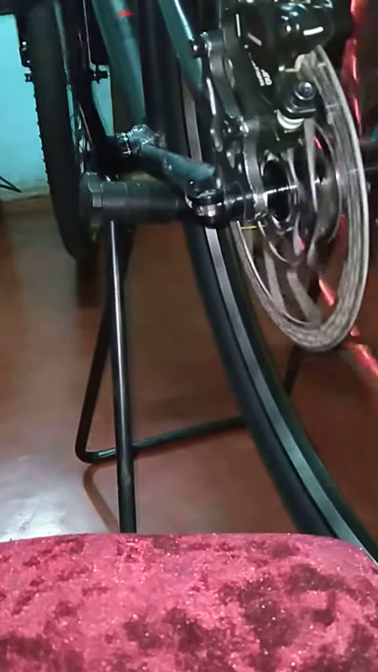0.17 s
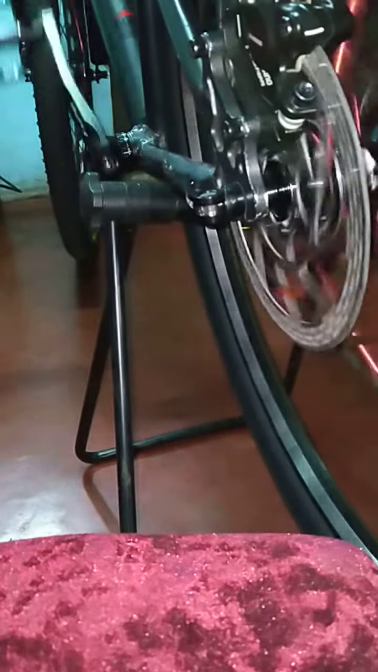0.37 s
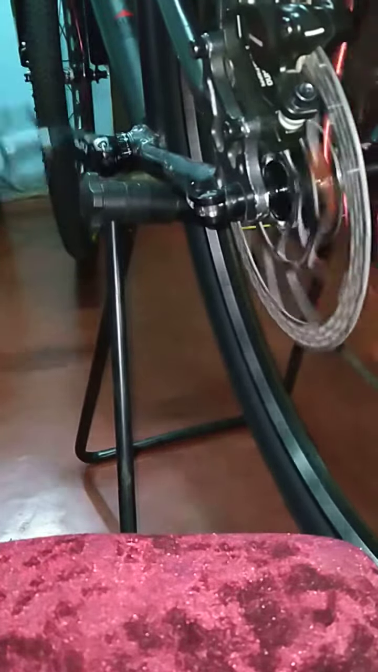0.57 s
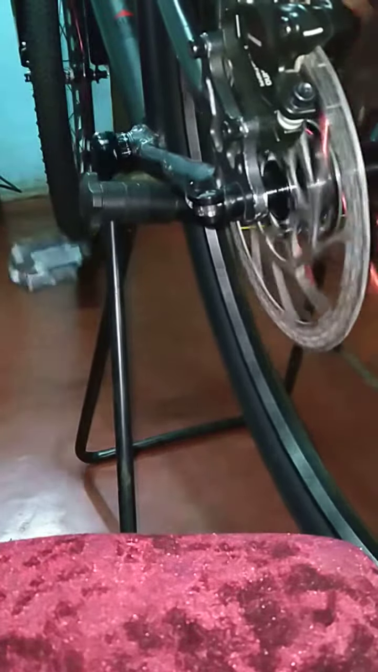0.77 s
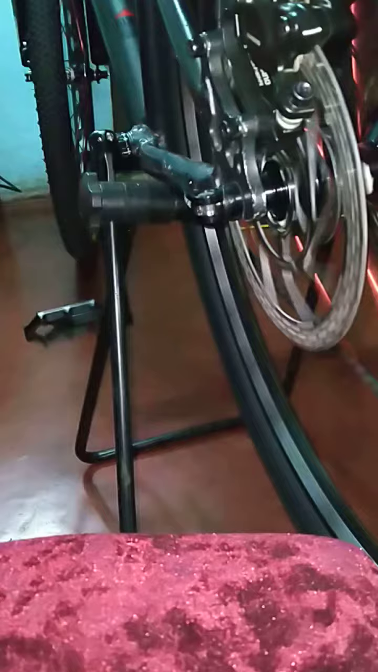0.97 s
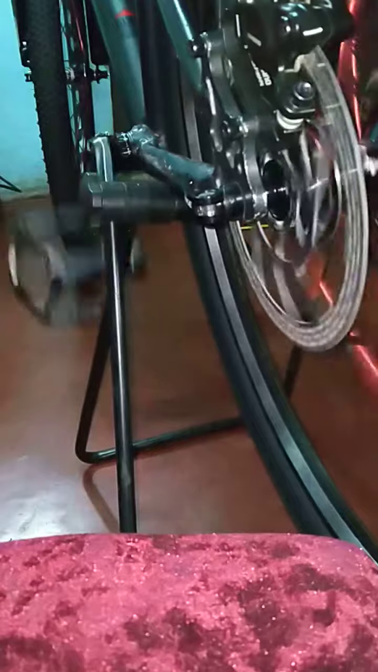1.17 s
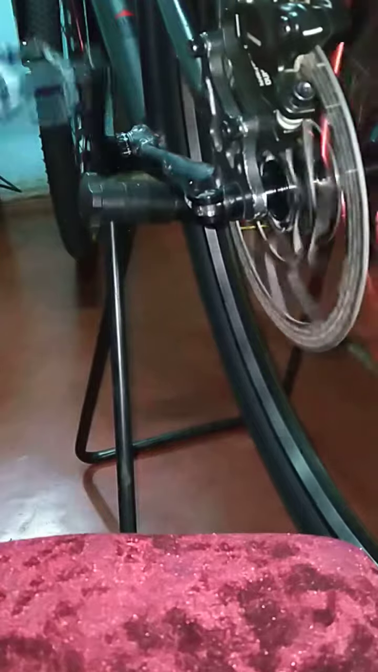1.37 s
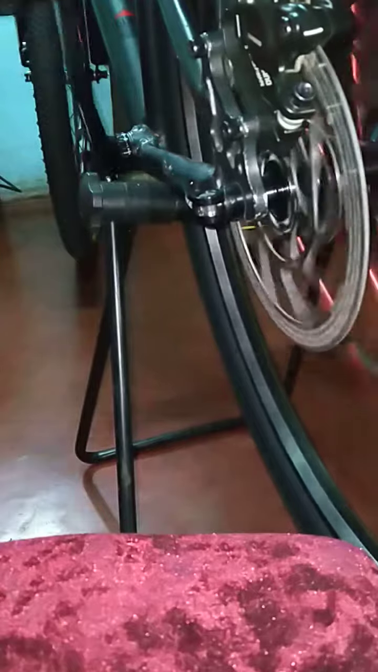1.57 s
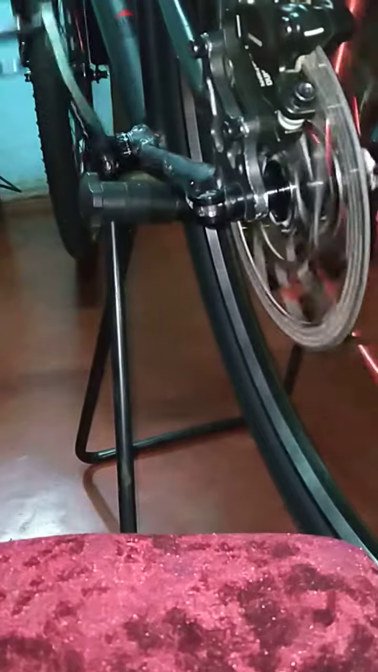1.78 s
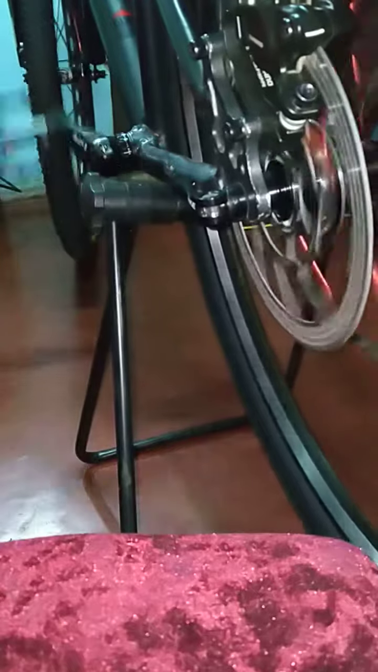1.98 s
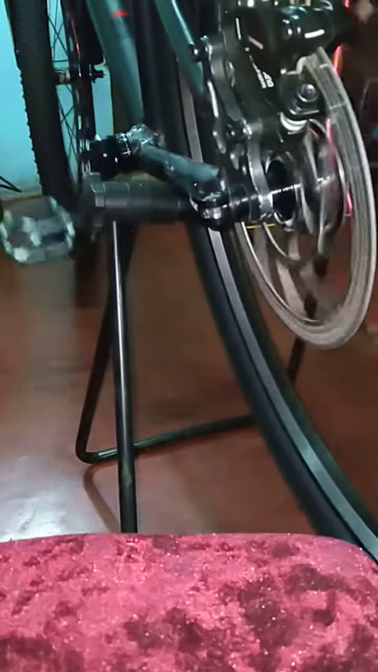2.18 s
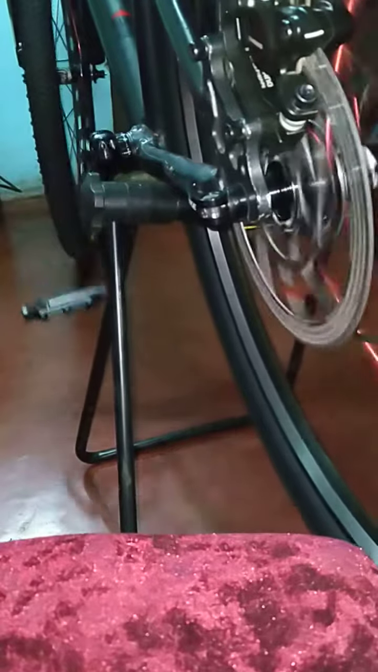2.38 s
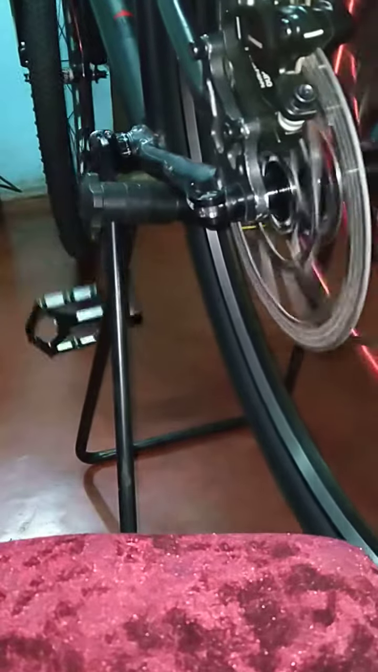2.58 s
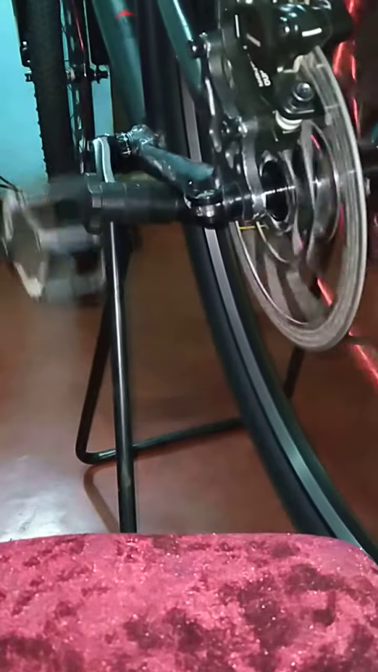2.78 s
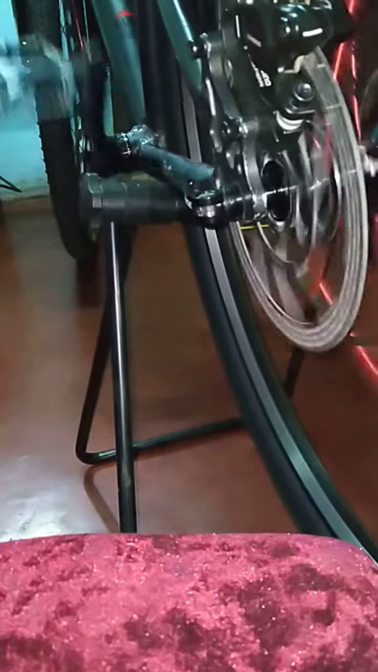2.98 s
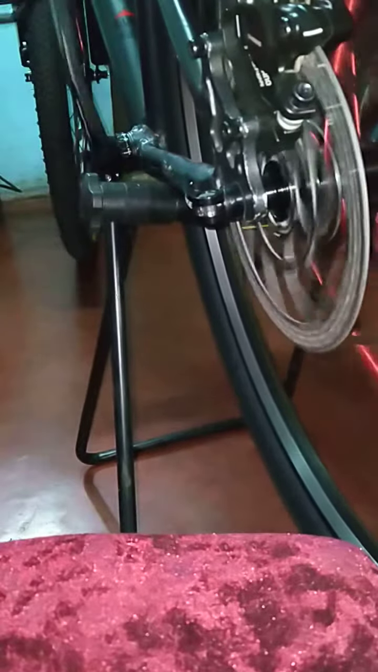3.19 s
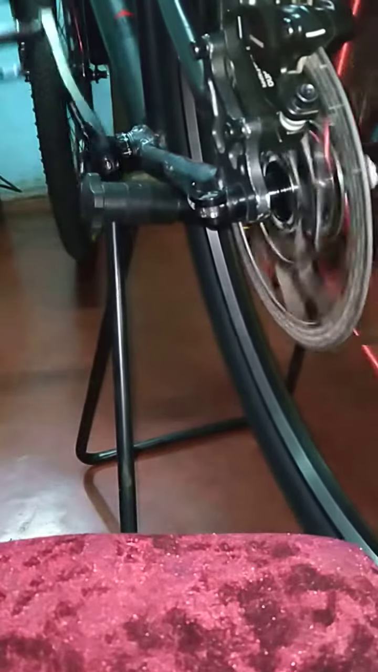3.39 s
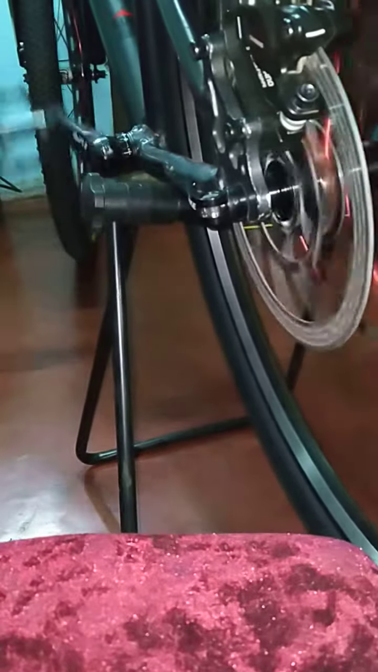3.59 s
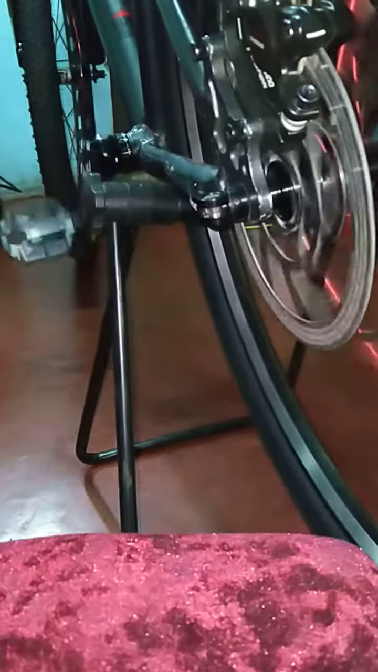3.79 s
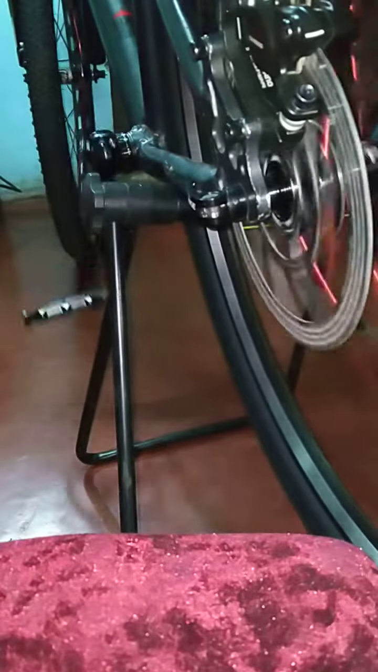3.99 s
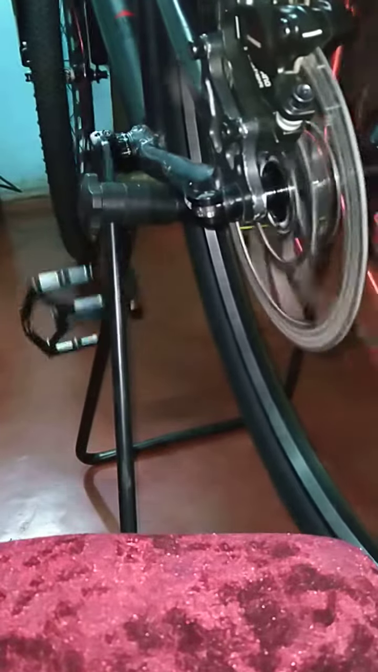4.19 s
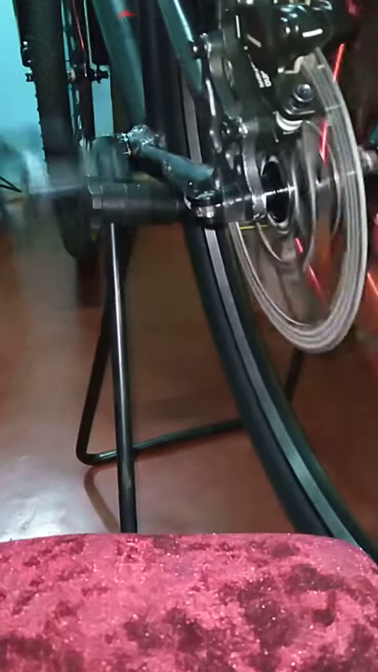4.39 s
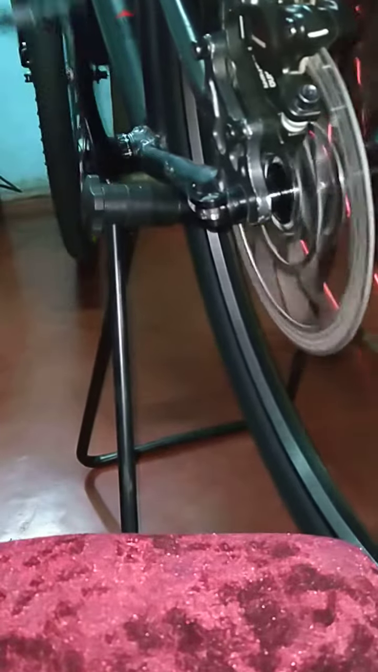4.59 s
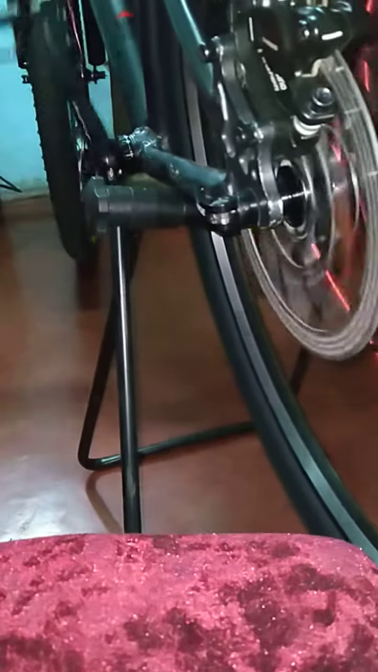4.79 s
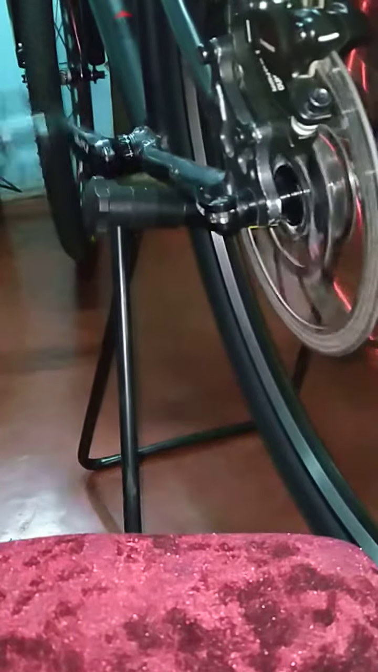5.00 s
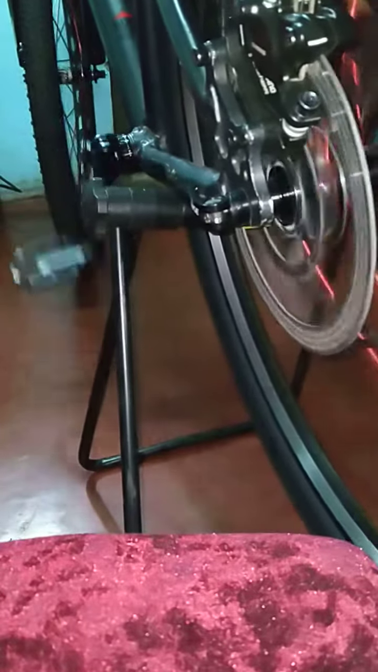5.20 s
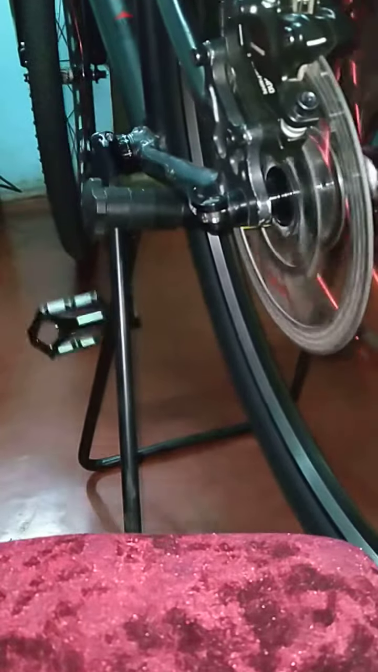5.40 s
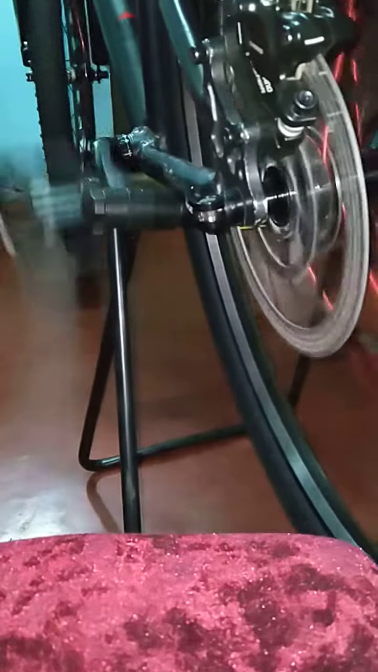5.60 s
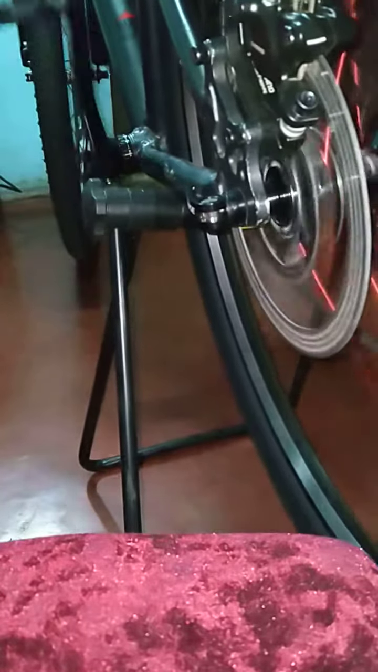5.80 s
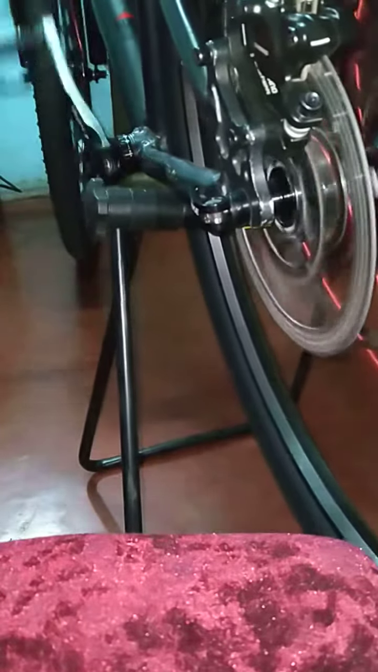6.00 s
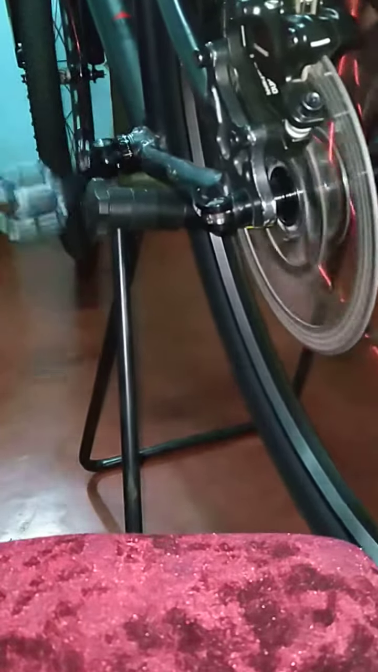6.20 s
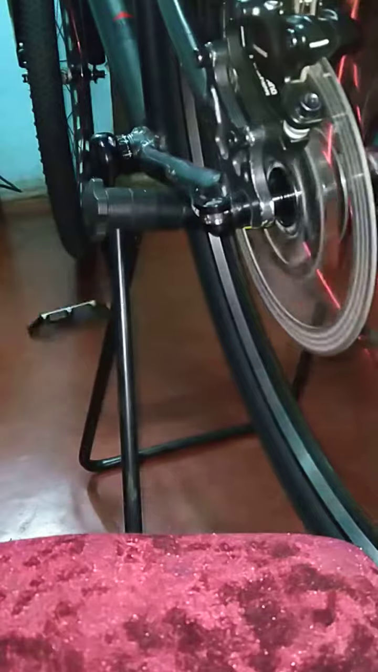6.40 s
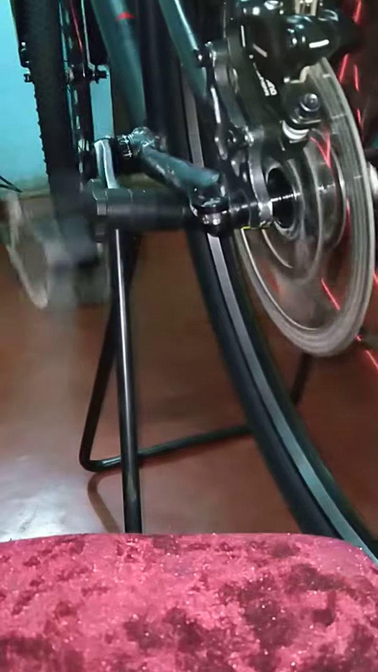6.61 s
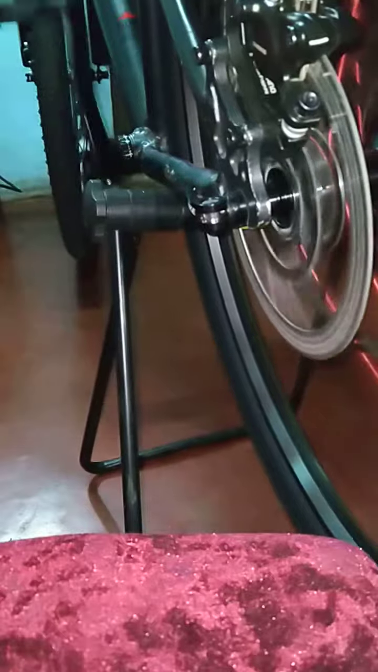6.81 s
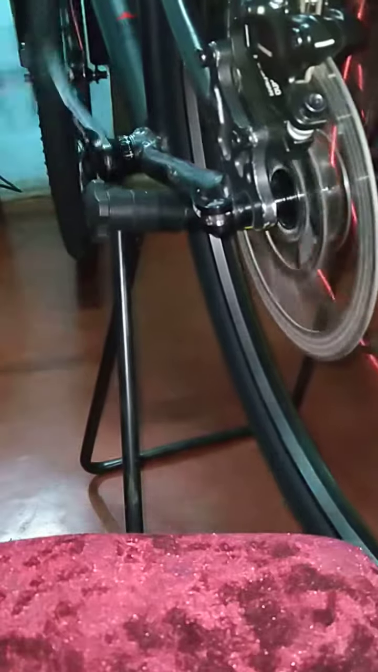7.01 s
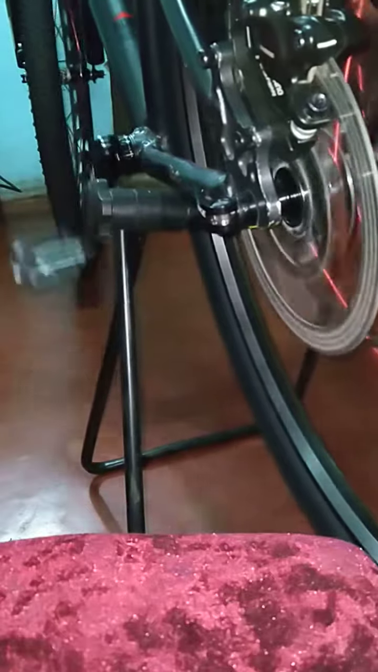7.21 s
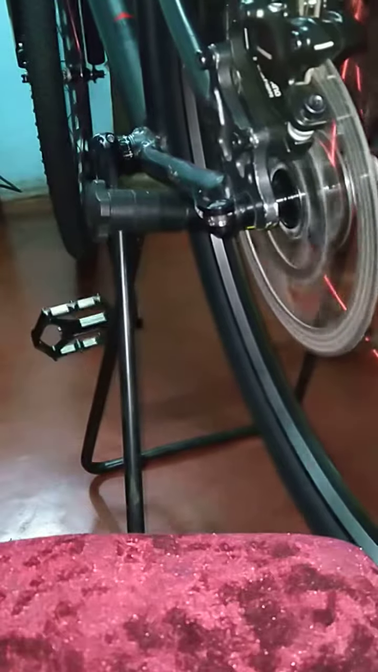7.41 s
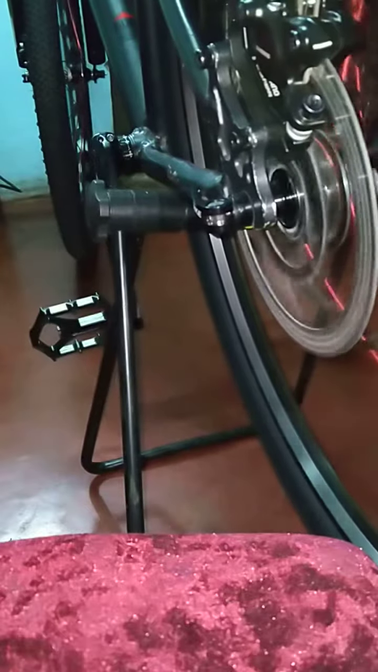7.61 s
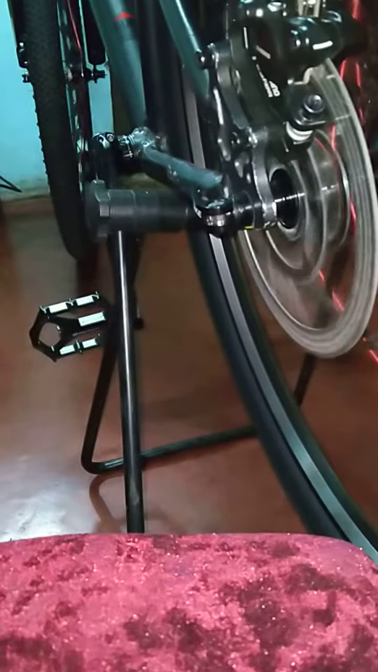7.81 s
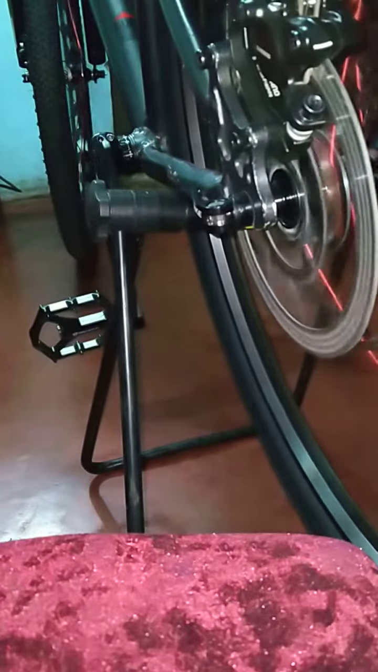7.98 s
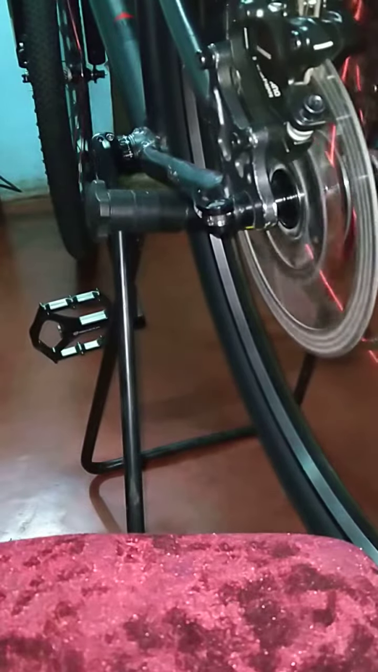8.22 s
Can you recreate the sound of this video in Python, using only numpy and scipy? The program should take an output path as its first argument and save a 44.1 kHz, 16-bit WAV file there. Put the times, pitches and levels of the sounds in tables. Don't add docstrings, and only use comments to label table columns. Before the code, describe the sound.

A bicycle on a stand is cranked by hand, heard close on a phone microphone in a small hard-floored room. From 0 seconds, crisp chain ticks run at about fifty per second, slightly uneven, over low wheel and stand rumble, bearing whirr and faint hiss. Between about 0.7 and 3.3 seconds gear shifting makes irregular metallic clanks and short rattles, strongest near 0.95, 1.1, 1.8, 2.9 and 3.2, with duller frame knocks between them. The ticking slows slightly around 2.2 and again at 3.3 to 3.6, then steadily accelerates, with only occasional small knocks. From 5 to 7.4 the chain whirrs faster and louder, nearly ninety ticks per second, with a firmer knock at 6.4. At 7.4 the crank stops: a loud sharp snap, then freehub clicks quickly gather into a bright, loud, ringing ratchet buzz, about two hundred teeth per second, sustained until the cut at about 8.25.

```python
import sys
import numpy as np
from scipy import signal
from scipy.fft import rfft, irfft
from scipy.io import wavfile

SR = 44100
rng = np.random.default_rng(int(sys.argv[2]) if len(sys.argv) > 2 else 0)


def wav_record(signal):
    frames = np.transpose(np.atleast_2d(signal))
    bounded = np.clip(frames, -1, 1)
    quanta = np.round(bounded * 32767).astype(np.int16)
    wavfile.write(sys.argv[1], SR, quanta)


def voltage_ratio(decibels):
    exponent = np.asarray(decibels, float) / 20
    return 10 ** exponent


N = 363825
CRANK_STOP_S = 7.405


def links(level_db=-5.5, tail_t60=0.052):
    # (frequency [Hz], density [dB per Hz])
    tick_colour = [(710, -29), (1200, -6.5), (1980, -8.5), (2890, -6), (5020, -20), (7410, 3),
                   (11400, -26.5), (14800, 10), (16000, -2)]
    band_levels = (-3, 0, 6, -1.5)
    band_edges = ((800, 4300), (4300, 9000), (9000, 12500), (12500, 19000))
    tail_db, colour_spread_db = -11, 1.8
    s, db = link_times()
    colours = rng.standard_normal((900, 4))[:len(s)]
    noise = coloured(rng.standard_normal(N), tick_colour)
    out = 0
    for colour, band_db, edges in zip(colours.T, band_levels, band_edges):
        strikes = np.zeros(N)
        strikes[(s * SR).astype(int)] = voltage_ratio(db + level_db + band_db + colour_spread_db * colour)
        envelope = snap(strikes) + voltage_ratio(tail_db) * dying(strikes, tail_t60)
        out = out + envelope * band(noise, *edges)
    return out


def link_times():
    # (time [s], rate [links per s])
    chain = [(0, 54.18), (.7, 52.78), (1.3, 51.52), (1.9, 53.33), (2.2, 43.55), (2.87, 44.74),
             (2.97, 53.95), (3.2, 57.39), (3.3, 44.32), (3.6, 43.41), (4, 49.8), (4.5, 55.7), (5, 58.71),
             (5.4, 66.65), (5.8, 67.85), (6.4, 74.68), (7, 83.73), (7.42, 88.96)]
    # (time [s], peak level [dB])
    catch = [
        (7.413, -16.5),
    ]
    # (time [s], peak level [dB])
    stiff = [(0.0433, -59), (0.0794, -44), (0.1957, -51), (0.244, -44), (0.344, -45), (0.4414, -49),
             (0.711, -43), (0.819, -44), (1.5242, -32), (1.6721, -32.5), (1.8684, -31.5), (2.12, -24),
             (2.4019, -38), (2.6602, -28.5), (2.8933, -36), (3.6114, -42), (3.6274, -35), (3.872, -41),
             (4.3334, -41), (4.344, -44), (4.4693, -43), (4.6294, -43), (4.7136, -42.5), (5.111, -36.5),
             (5.241, -38), (5.6063, -41.5), (5.7855, -40), (6.815, -37), (6.8448, -42), (7.196, -34.5)]
    first_link, reseat_late = .37, .25
    link_db, inner_db, reseat_db, stiff_db = -41.5, -4.5, -7, 10
    pull_share, slack_db, spread_db = 0.83, 1.5, 2.5
    per_s = in_time(chain)[0]
    passed = np.cumsum(per_s) / SR - first_link
    count = np.arange(int(passed[int(CRANK_STOP_S * SR)]))
    chance = rng.standard_normal((600, 3))[:len(count)]
    s = np.interp(count + .04 * chance[:, 0], passed, np.arange(N) / SR)
    at = (s * SR).astype(int)
    outer = count % 2 == 0
    db = (pulled((link_db, pull_share, 0)) + slack_db * drift(6.5))[at]
    db = db + inner_db * ~outer + spread_db * chance[:, 1]
    again_s = s + reseat_late / per_s[at]
    again_db = db + reseat_db + spread_db * chance[:, 2]
    again = np.transpose([again_s, again_db])[outer]
    return np.vstack([catch, np.add(stiff, [0, stiff_db]), np.transpose([s, db]), again]).T


def clanks(rise_s=0.0022, hold_t60=0.19, fall_t60=0.19, grain_db=2.5, knock_db=4.5, knock_t60=0.014, room_db=-21.5):
    # (frequency [Hz], density [dB per Hz])
    clank_colour = [(59, 0), (100, -13.5), (452, -4), (801, -13), (930, -8.5), (1760, -3.5), (2000, -5),
                    (2990, -5), (3940, -5), (4200, -5.5), (6020, -3.5), (7450, 6), (9820, -5.5), (15000, 0),
                    (16000, 13)]
    # (frequency [Hz], width [Hz], level [dB])
    sprocket_modes = [(760, 70, 0), (1050, 70, 7), (1250, 70, 6), (1700, 80, 8), (2350, 80, 8),
                      (2800, 90, 6), (3350, 90, 6), (4250, 120, 4), (5350, 150, 8)]
    # (time [s], peak
    # level [dB], ring frequency [Hz], thud level [dB], rattle length [s])
    bright_clanks = [(0.711, -49, 1780, -4, 0.01), (0.949, -26, 1780, -16, 0.055),
                     (1.122, -27.5, 2330, -14, 0.026), (1.412, -41, 790, 6, 0.049), (1.428, -30, 1090, -8, 0.017),
                     (1.449, -37.5, 2870, 9.5, 0.025), (1.489, -39, 1120, -2, 0.011),
                     (1.666, -50.5, 1830, 9, 0.04), (1.788, -24.5, 1190, -22.5, 0.036),
                     (1.868, -44, 1630, 7, 0.021), (1.942, -27, 1920, -16.5, 0.019),
                     (2.115, -29, 3200, -10.5, 0.067), (2.327, -30, 3200, -12, 0.019),
                     (2.659, -46.5, 2330, -3, 0.011), (2.912, -40.5, 1060, -2, 0.032),
                     (2.933, -24.5, 1820, -25, 0.037), (3.089, -46, 1280, -6, 0.05),
                     (3.208, -24.5, 990, -6, 0.035), (3.229, -24.5, 1710, -15, 0.021),
                     (3.253, -34.5, 1580, 8.5, 0.042), (3.625, -49, 2290, 3, 0.029),
                     (6.648, -43.5, 2570, -3, 0.063), (6.76, -48.5, 1320, 13, 0.097), (7.151, -40, 990, 8, 0.035)]
    # (time [s], peak level [dB], ring frequency [Hz], thud level [dB], jingle level [dB])
    knocks = [(0.242, -49.5, 2030, -3, -22), (0.335, -58.5, 1060, 9, -25), (0.786, -41.5, 1320, 1, -17.5),
              (0.83, -37, 1930, -0.5, -8), (1.086, -40.5, 990, 0, -12), (1.518, -40.5, 1330, 0, -16),
              (2.381, -39, 1040, 4, -24), (2.636, -28.5, 980, -7.5, -2.5), (3.314, -49.5, 980, 5, -22),
              (3.801, -41.5, 890, -1, -7), (3.87, -48.5, 2310, -7, 0), (4.017, -40, 1070, 2, -23),
              (4.293, -38.5, 3330, 0.5, -2.5), (4.884, -44, 3350, -23, -5), (5.112, -39.5, 2920, -4, -7),
              (5.24, -50, 2950, -25, -13), (5.337, -36.5, 1010, -4.5, -16), (5.53, -46, 910, 5, -13),
              (5.71, -45.5, 956, 1, 0), (5.784, -47, 1110, 8, 4), (6.42, -33, 1080, -2.5, -20.5),
              (7.193, -41.5, 2220, -18, -7), (7.333, -34.5, 1140, -14, -21), (7.528, -39.5, 990, 1, -19.5)]
    shift_jingle_db, knock_rattle_s, sprocket_db = 1.5, .022, -6
    jingle_follows, kick_follows_thud = 1.4, 0.37
    frame_hz, frame_width_hz, frame_db = 948, 10.5, -7.5

    out, kicks, t = np.zeros(N), np.zeros(N), np.arange(SR // 3) / SR
    noise = rng.standard_normal(N)
    grains_db = grain_db * rng.exponential(1, N // 32 + 1).clip(0, 3)
    rattle = coloured(noise * voltage_ratio(grains_db.repeat(32)[:N]), clank_colour)
    regions = ((100, 650), (550, 3700), (3700, 19000))
    thud, body, jingle = (rms_one(band(band(rattle, *edges), *edges)) for edges in regions)
    bright = body + 2 * jingle
    rings = np.array([voltage_ratio(g + sprocket_db) * resonate(bright, hz, width) for hz, width, g in sprocket_modes])
    strengths = voltage_ratio(4 * rng.standard_normal((80, len(rings))))
    blows = [(*row[:4], shift_jingle_db, row[4]) for row in bright_clanks]
    blows += [(*row, knock_rattle_s) for row in knocks]
    for (s, db, hz, thud_db, jingle_db, length), mix in zip(blows, strengths):
        at = slice(int(s * SR), min(N, int(s * SR) + len(t)))
        u = t[:at.stop - at.start]
        fall = voltage_ratio(-60 * u / hold_t60 - 60 * np.maximum(u - length, 0) / fall_t60)
        shape = (1 - np.exp(-u / rise_s)) * (fall + voltage_ratio(room_db - u / 0.0046))
        mix[-2:] *= min(1, voltage_ratio(jingle_db))
        middle = shape * (body[at] + mix @ rings[:, at])
        middle = middle + resonate(middle, hz, 250)
        knock = voltage_ratio(knock_db - 0.86 * jingle_db - 60 * u / knock_t60) * (1 - np.exp(-u / 0.0005))
        knock = knock * (np.sin(2 * np.pi * hz * u) + 0.27 * np.sin(2 * np.pi * 2380 * u))
        ends = voltage_ratio(thud_db + 5.0) * thud[at] + voltage_ratio(jingle_follows * jingle_db + 11) * jingle[at]
        out[at] += voltage_ratio(db - 13.0) * (knock + middle + shape * ends)
        kicks[at] += voltage_ratio(db + 2.0 + kick_follows_thud * thud_db) * shape
    stand = resonate(kicks * rng.standard_normal(N), 167.0, 18.0)
    frame = resonate(out, frame_hz, frame_width_hz)
    return out + voltage_ratio(15.0) * stand + voltage_ratio(frame_db) * frame


def freehub(level_db=1.55):
    # (time [s], rate [teeth per s], level [dB])
    freewheel = [(7.432, 40, -38), (7.46, 66, -33.5), (7.49, 126, -31), (7.538, 161, -32),
                 (7.628, 220, -33), (7.68, 227, -32.5), (7.764, 223, -32.5), (7.945, 207, -32.8),
                 (8.25, 206.5, -32.8)]
    # (lateness [share of a tooth], level [dB])
    pawls = [
        (0, 0),
        (.16, -3),
        (.36, -5),
    ]
    # (frequency [Hz], width [Hz], level [dB])
    hub_modes = [(2255, 130, -5.5), (2330, 30, -5), (2450, 30, -12), (3345, 24, -4), (1780, 54, -7),
                 (6890, 90, -4), (7480, 200, -0.5)]
    # (frequency [Hz], density [dB per Hz])
    hub_colour = [(410, -70), (700, -39), (1050, -19), (1180, -19), (1280, -14.5), (2240, -5),
                  (2590, -10.5), (3460, -10), (4050, -15.5), (5330, -14.5), (7390, -12), (10100, -22.5),
                  (12600, -23.5), (14800, -6.5), (16000, -10.5)]
    chatter_db, ring_db, sway_db = -1, 7, 1.5
    per_s, db = in_time(freewheel)
    coasting = np.arange(N) >= freewheel[0][0] * SR
    teeth = np.cumsum(per_s * coasting) / SR + .64
    t = np.arange(SR // 5) / SR
    hits, chatter = 0, 0
    for late, pawl_db in pawls:
        wander = .05 * drift(11)
        at = np.flatnonzero(np.diff(np.floor(np.maximum(teeth - wander - late, 0))))
        chance = rng.standard_normal((400, 2))[:len(at)]
        drops = np.zeros(N)
        jitter = np.round(25e-6 * SR * chance[:, 0]).astype(int)
        at = np.clip(at + jitter, 0, N - 1)
        drops[at] = voltage_ratio(pawl_db + sway_db * drift(24)[at] + 1.5 * chance[:, 1])
        echoes = rng.standard_normal(len(t)) * (voltage_ratio(-60 * t / .015) + voltage_ratio(-13 - 60 * t / .14))
        hits = hits + signal.fftconvolve(drops, echoes)[:N]
        chatter = chatter + dying(drops, .03)
    chatter = band(chatter * rng.standard_normal(N), 2400, 19000)
    hits = rms_one(hits) + voltage_ratio(chatter_db) * rms_one(chatter)
    hits = hits + sum(voltage_ratio(ring_db + g + 0.95 * drift(28)) * resonate(hits, hz, width)
                      for hz, width, g in hub_modes)
    buzz = coloured(hits, hub_colour)
    return voltage_ratio(db + level_db) * buzz / np.sqrt(np.mean(buzz[-SR // 2:] ** 2))


def drive_train(hum_hz=66.4, wobble_hz=2.7, patchy_db=2.5):
    # (time [s], level [dB])
    sway = [(0, -71), (.7, -56), (1.0, -61.5), (1.5, -56.5), (2.0, -63), (2.5, -74), (4.0, -67), (5.0, -72),
            (8.25, -75)]
    # (frequency [Hz], density [dB per Hz])
    rumble = [(88, -16.5), (150, 4), (217, 1.5), (350, 5), (445, -1), (735, -12), (823, -14), (900, -18.5),
              (1170, -37), (1980, -120)]
    whirr = [(350, -43), (600, 13), (831, 5.5), (943, 10), (2520, 7), (2980, 10), (4000, 0.5), (5200, -43),
             (8800, -120)]
    hiss = [(2350, -57), (4000, -10), (5500, -12.5), (7480, -3), (10100, -15), (11600, -12), (14800, -4),
            (16000, -17.5)]
    rumble_db, whirr_db = pulled((-61.5, 0.76, -4)), pulled((-68.5, 0.69, -1.5))
    hiss_db, boom_db = pulled((-70.5, 0.99, 8.5)), pulled((-65, -0.32, -0.91))
    stand_db = pulled((-66.5, 0.6, -4.5))
    hum_db, = in_time(sway)
    hum = np.sqrt(2) * np.sin(2 * np.pi * np.cumsum(hum_hz + wobble_hz * drift(1.7)) / SR)
    out = voltage_ratio(hum_db + 1.5 * drift(8)) * hum
    second_mode = np.sin(2 * np.pi * np.cumsum(96 + 1.7 * drift(5)) / SR)
    out = out + voltage_ratio(stand_db + 2.5 * drift(3)) * second_mode
    boom = rms_one(band(rng.standard_normal(N), 94, 147))
    out = out + voltage_ratio(boom_db + 5.4 * drift(11)) * boom
    ticks = (rng.random(N) < 90 / SR) * voltage_ratio(3 * rng.standard_normal(N))
    pulleys = 1 + voltage_ratio(-2) * snap(ticks)
    layers = ((rumble_db, rumble, 1), (whirr_db, whirr, np.sqrt(pulleys)), (hiss_db, hiss, pulleys))
    for db, spectrum, grain in layers:
        noise = rms_one(coloured(rng.standard_normal(N), spectrum))
        out = out + voltage_ratio(db + patchy_db * drift(25)) * grain * noise
    return out


def pulled(law):
    # (time [s], level [dB])
    effort = [(0, 1), (.45, -3.5), (.9, 2.5), (1.4, -1.5), (2.5, -0.5), (3.1, 3.5), (3.5, -0.5), (4.4, 3),
              (5.3, 8), (6.2, 8), (6.8, 11.5), (7.4, 14.5)]
    db, share, coast_db = law
    coasting = np.clip((np.arange(N) / SR - CRANK_STOP_S) / 0.36, 0, 1)
    return db + share * in_time(effort)[0] + coast_db * coasting


def snap(strikes):
    return dying(dying(strikes, .0065), .004) / 12


def dying(strikes, t60):
    return signal.lfilter([1], [1, -voltage_ratio(-60 / (t60 * SR))], strikes + 1e-18)


def resonate(x, hz, width_hz):
    r = np.exp(-np.pi * width_hz / SR)
    gain = (1 - r * r) / 2
    return signal.lfilter([gain, 0, -gain], [1, -2 * r * np.cos(2 * np.pi * hz / SR), r * r], x)


def response(spectrum):
    hz, db = np.transpose(spectrum)
    size = 8192
    bins_hz = np.arange(size // 2 + 1) * SR / size
    cepstrum = irfft(np.log(voltage_ratio(np.interp(np.log(bins_hz + 1), np.log(hz), db))))
    cepstrum[1:size // 2] *= 2
    cepstrum[size // 2 + 1:] = 0
    taps = irfft(np.exp(rfft(cepstrum)))
    return taps / np.sqrt(np.sum(taps ** 2))


def coloured(x, spectrum):
    return signal.fftconvolve(x, response(spectrum))[:len(x)]


def band(x, low_hz, high_hz):
    edges = [low_hz, min(high_hz, .45 * SR)]
    return signal.sosfilt(signal.butter(2, edges, "band", fs=SR, output="sos"), x)


def rms_one(x):
    return x / np.sqrt(np.mean(x ** 2) + 1e-20)


def in_time(rows):
    s, *columns = np.transpose(rows)
    return [np.interp(np.arange(N) / SR, s, c) for c in columns]


def drift(rate):
    knots = rng.standard_normal(int(N / SR * 40) + 2)
    return np.interp(np.arange(N) / SR * rate, np.arange(len(knots)), knots)


def scene():
    return (links() + clanks() + freehub() + drive_train())[None]


def roll_off(x):
    return signal.sosfilt(signal.butter(12, 16980, fs=SR, output="sos"), x)


def record(dry):
    mix = signal.sosfilt(signal.butter(5, 58, "high", fs=SR, output="sos"), dry)
    mix = signal.sosfilt(signal.cheby2(12, 45, 16200, fs=SR, output="sos"), mix)
    return roll_off(mix)


dry = scene()
out = record(dry)
wav_record(out)
```